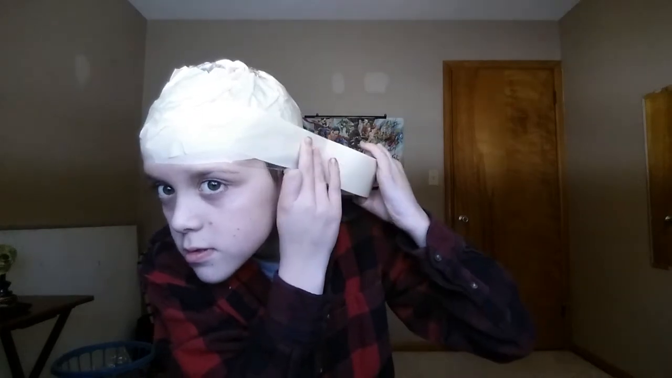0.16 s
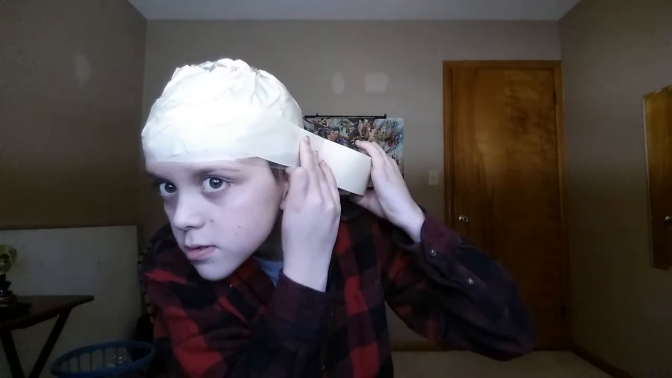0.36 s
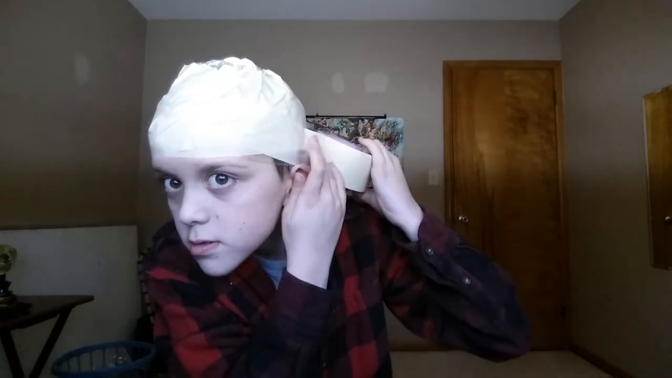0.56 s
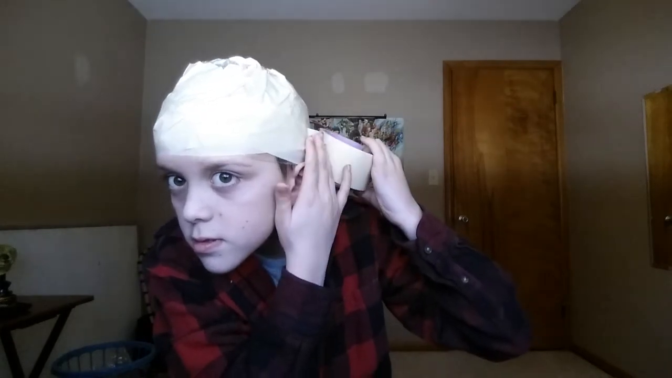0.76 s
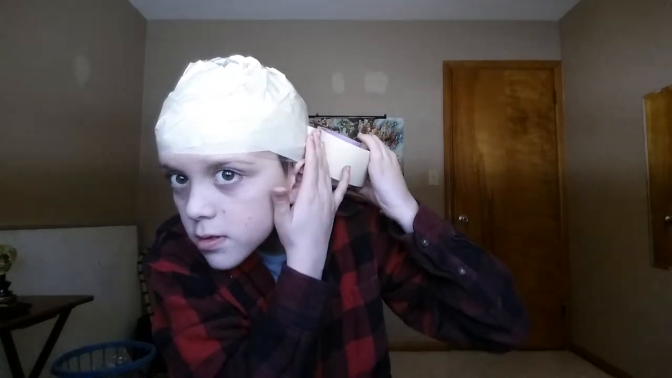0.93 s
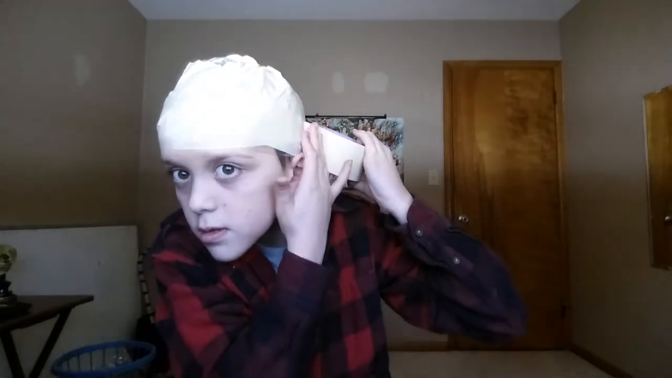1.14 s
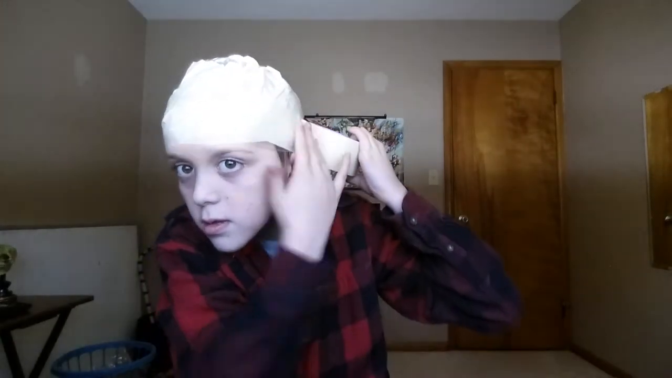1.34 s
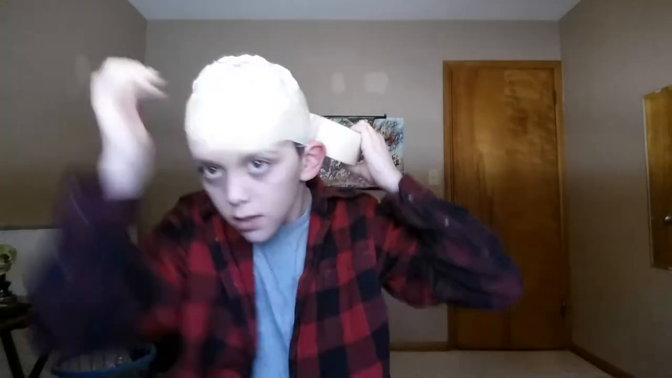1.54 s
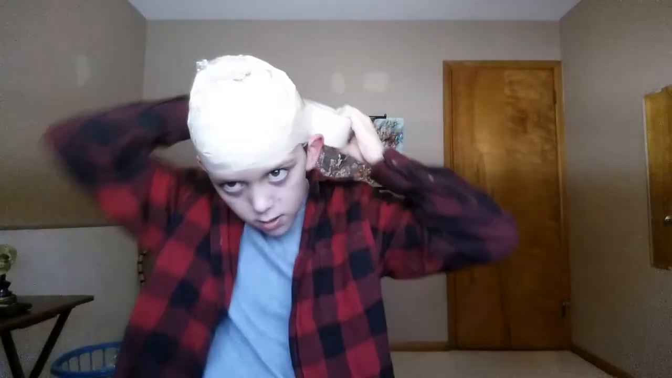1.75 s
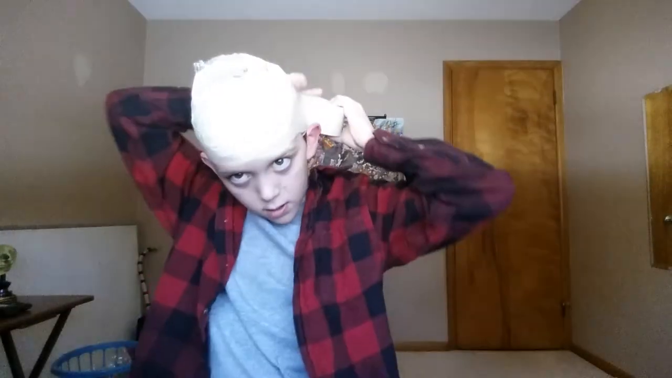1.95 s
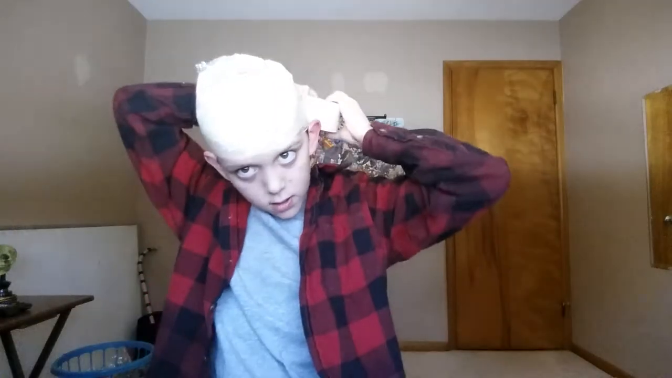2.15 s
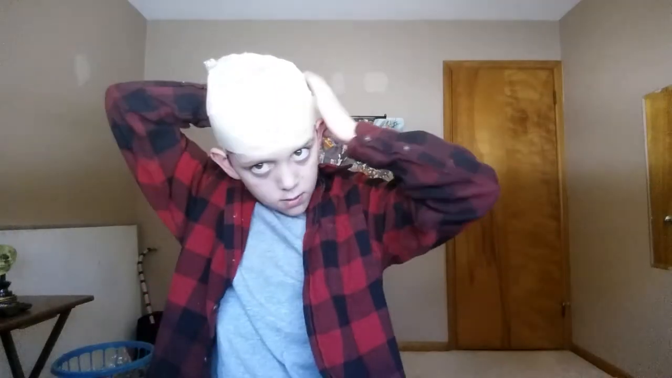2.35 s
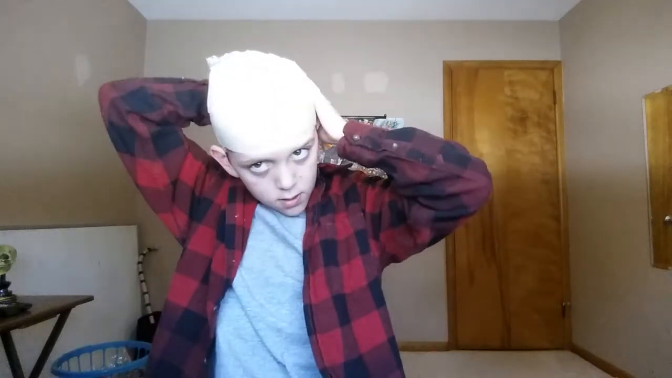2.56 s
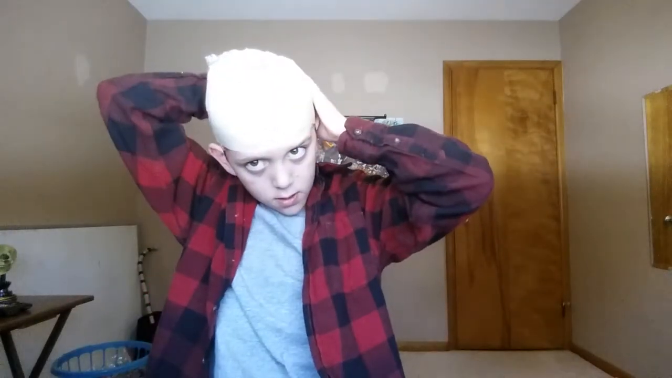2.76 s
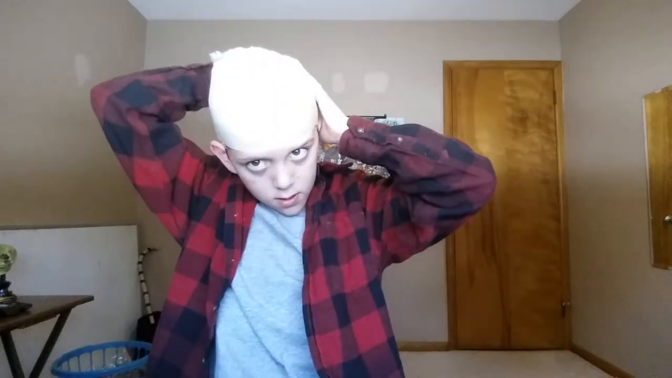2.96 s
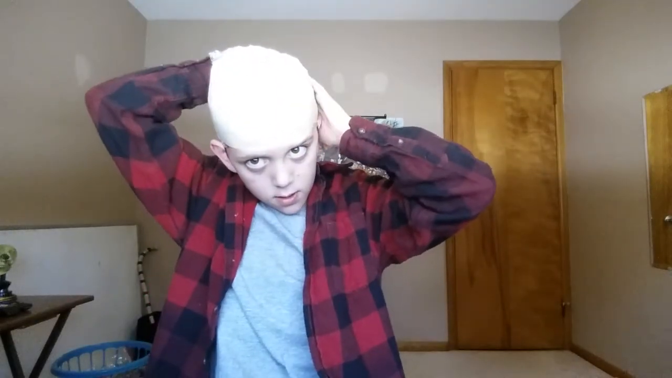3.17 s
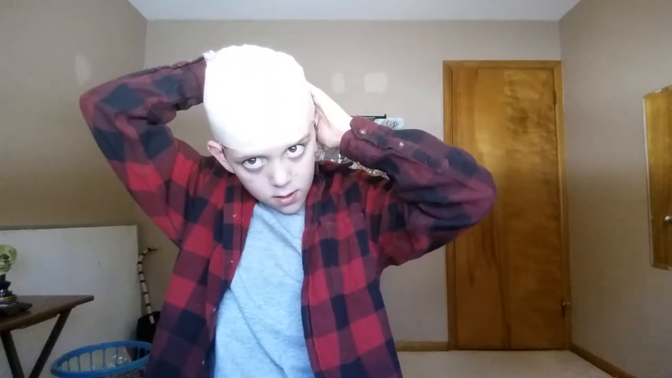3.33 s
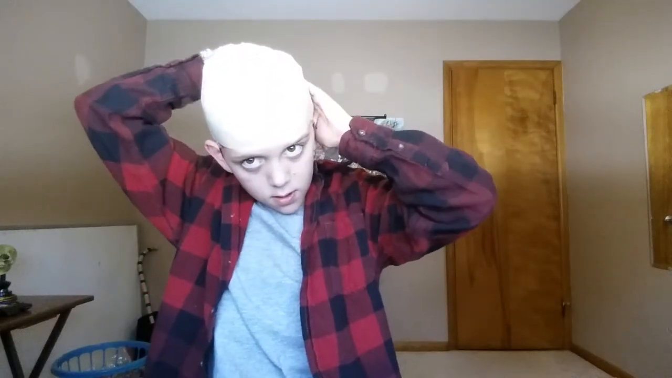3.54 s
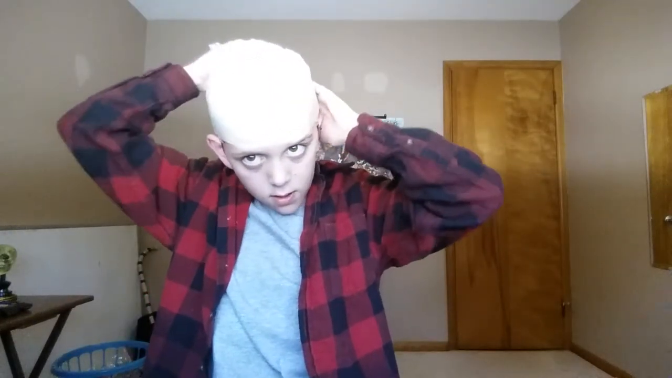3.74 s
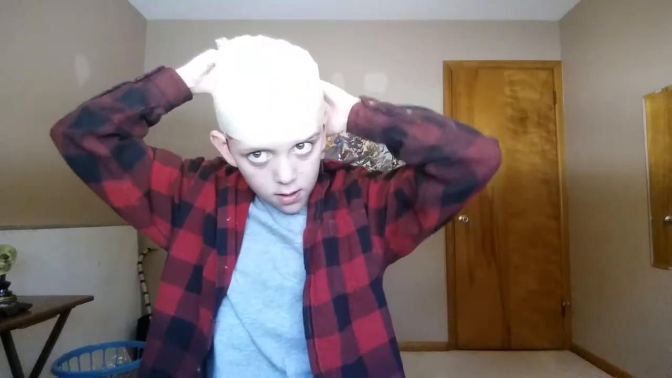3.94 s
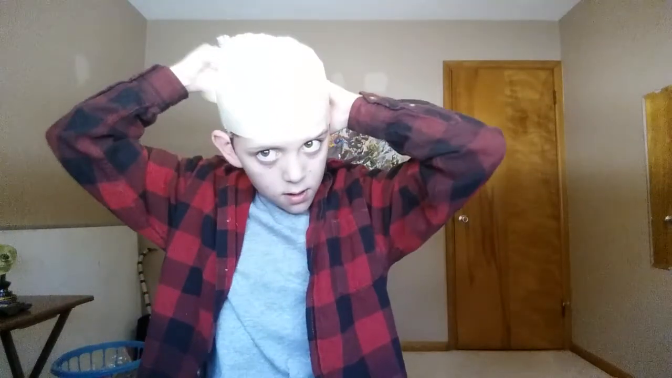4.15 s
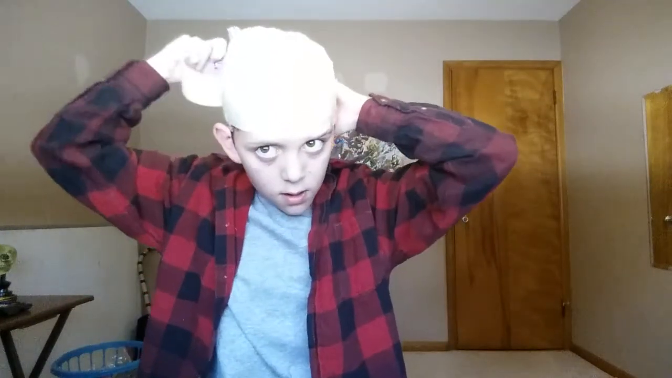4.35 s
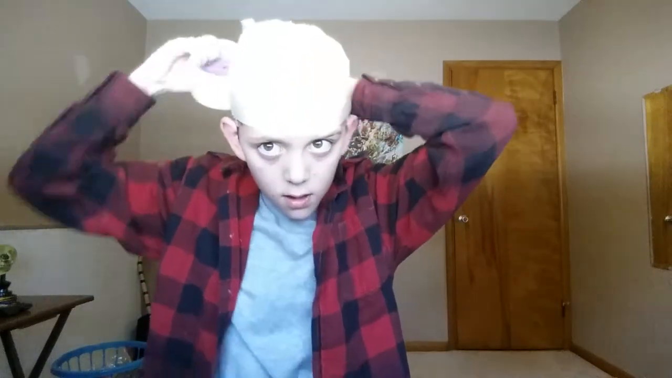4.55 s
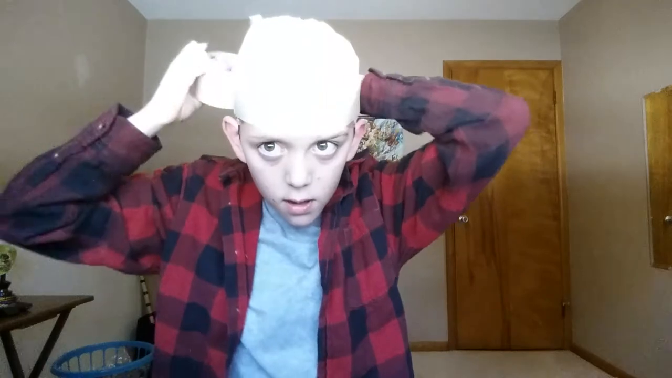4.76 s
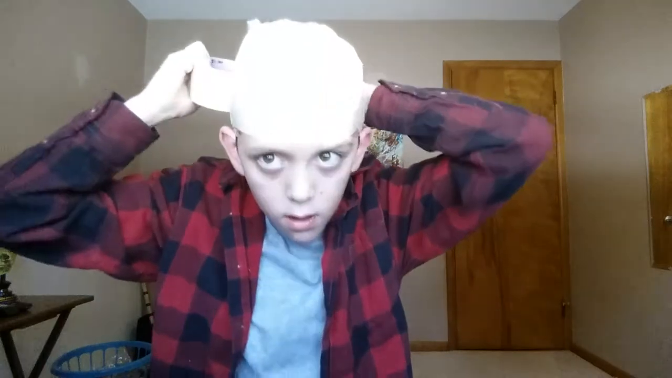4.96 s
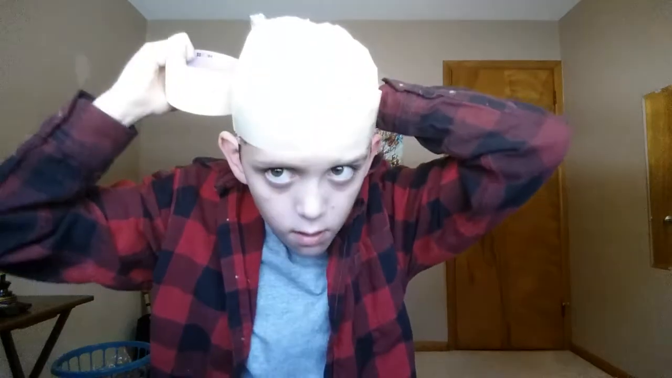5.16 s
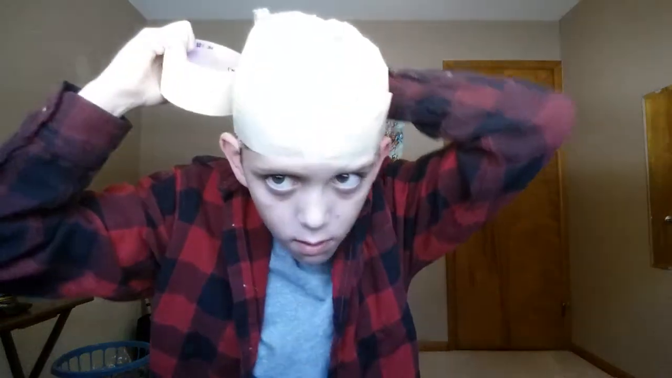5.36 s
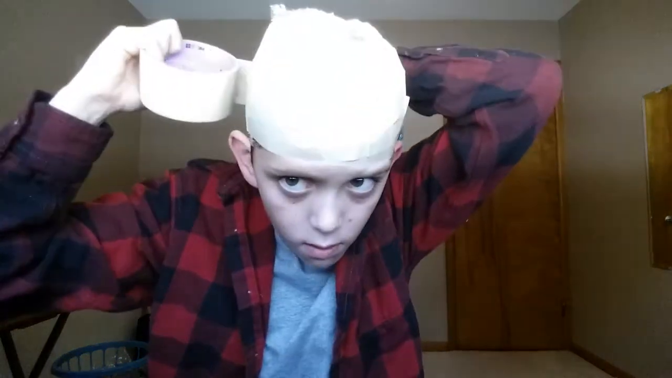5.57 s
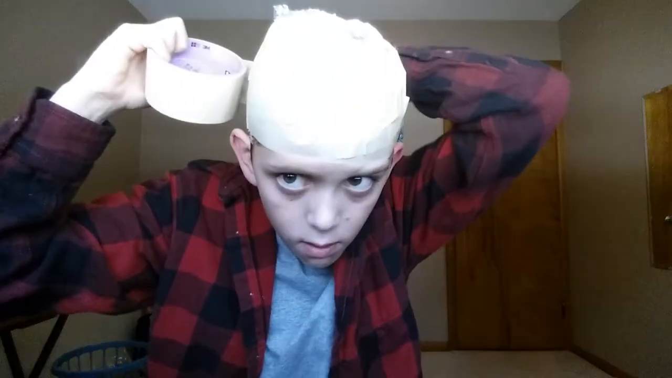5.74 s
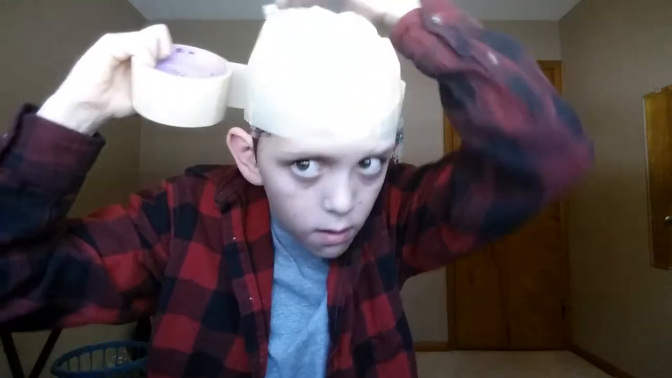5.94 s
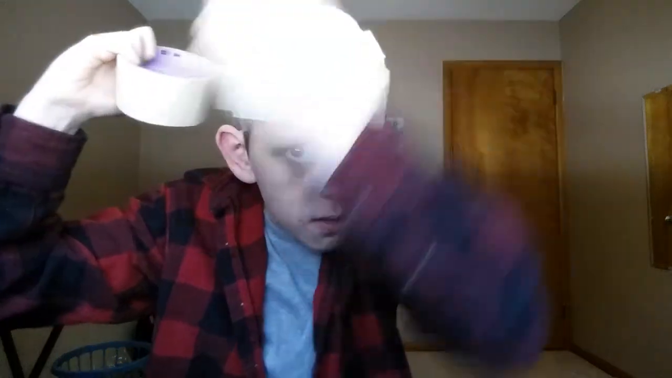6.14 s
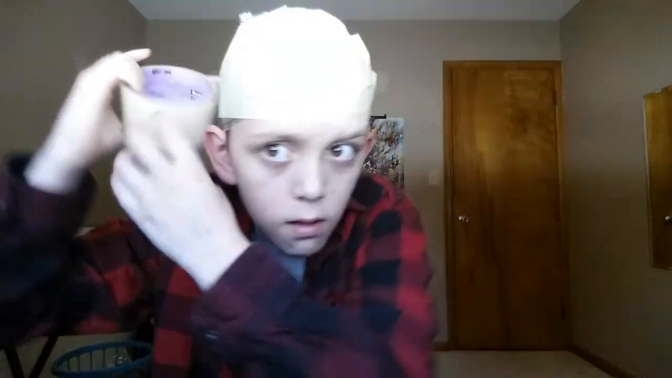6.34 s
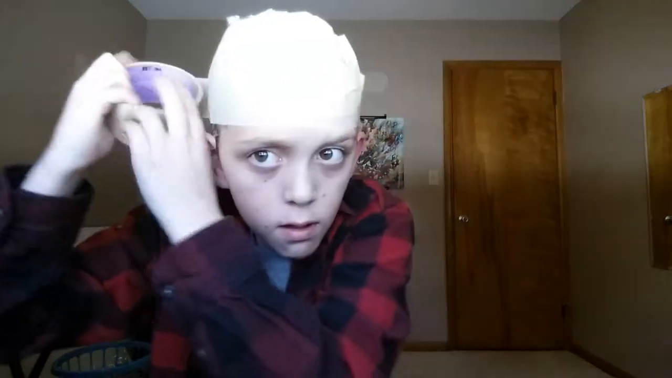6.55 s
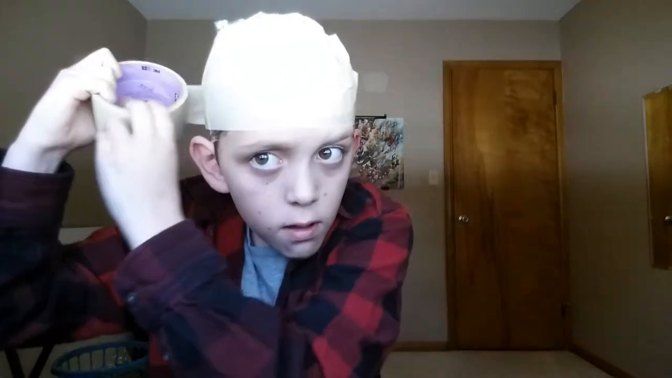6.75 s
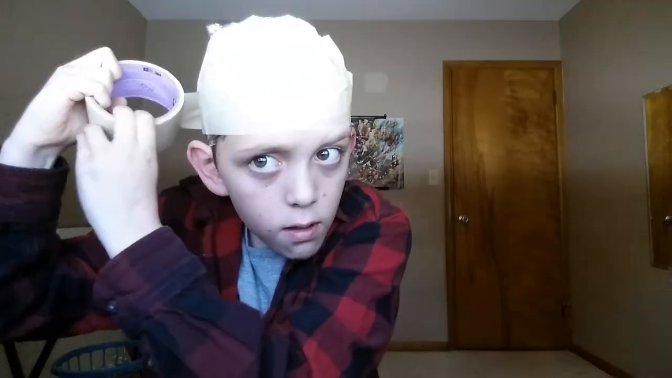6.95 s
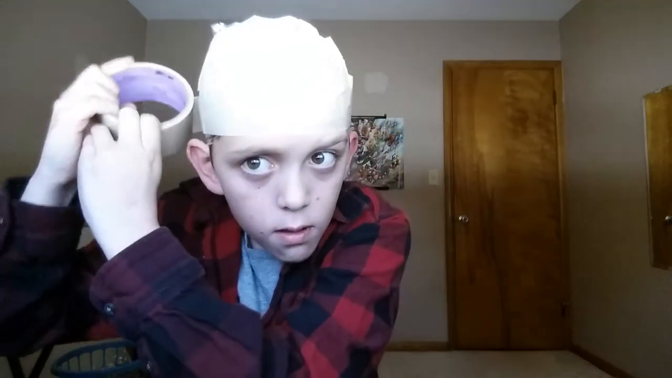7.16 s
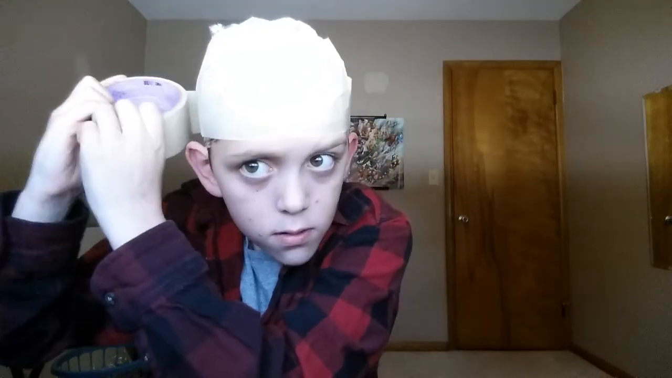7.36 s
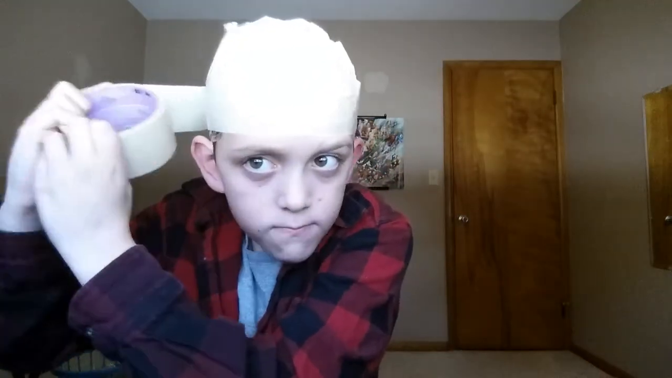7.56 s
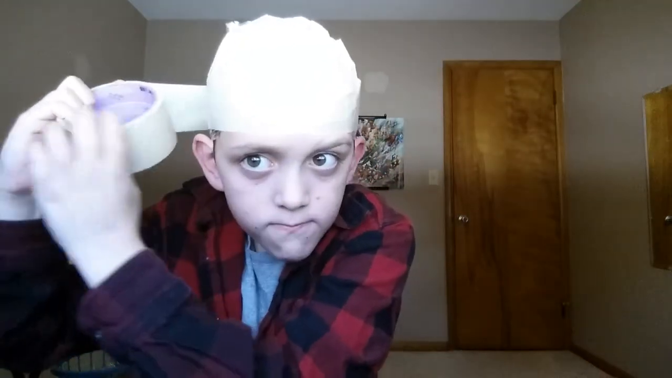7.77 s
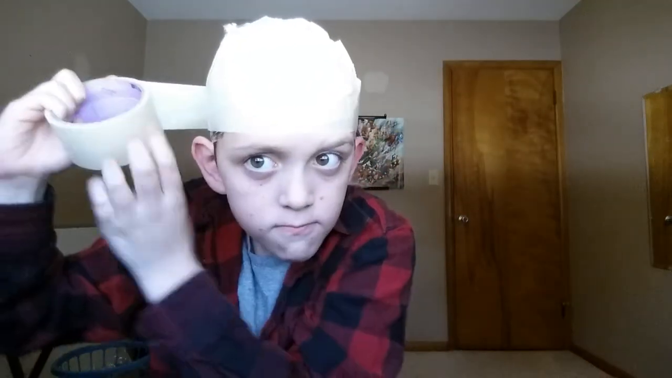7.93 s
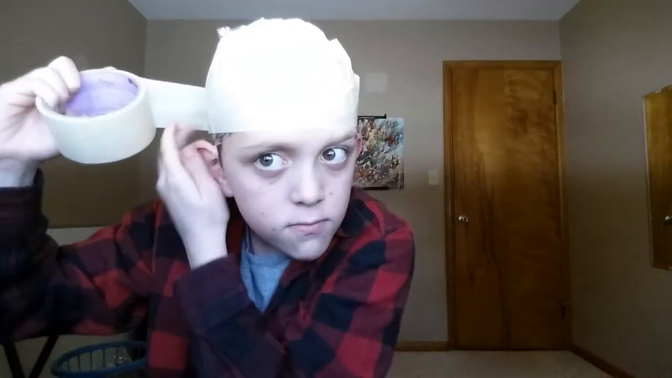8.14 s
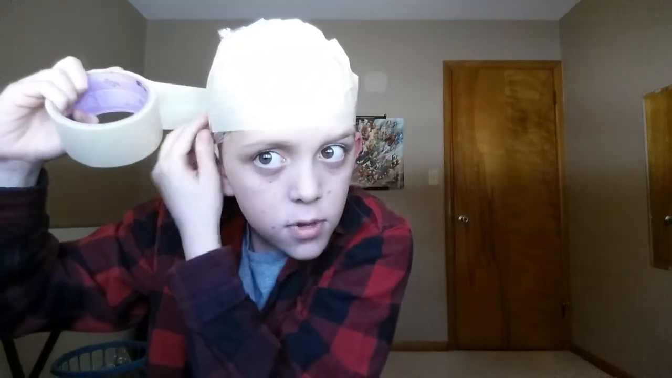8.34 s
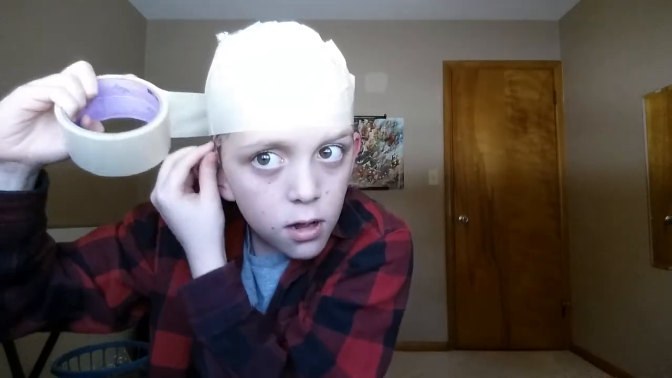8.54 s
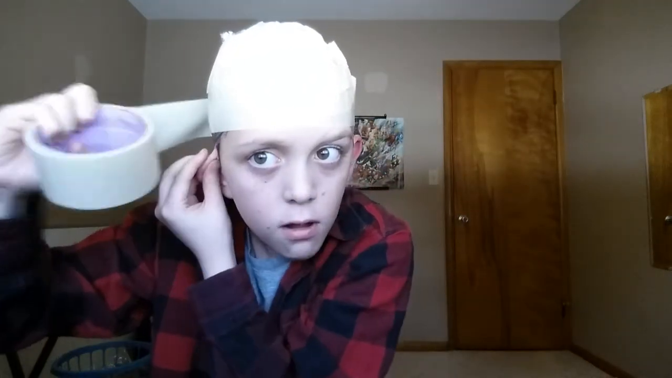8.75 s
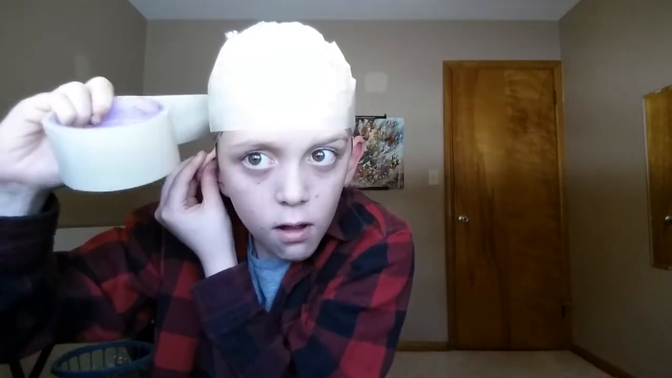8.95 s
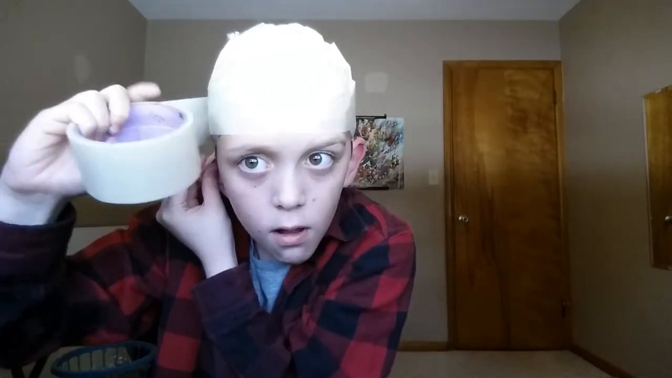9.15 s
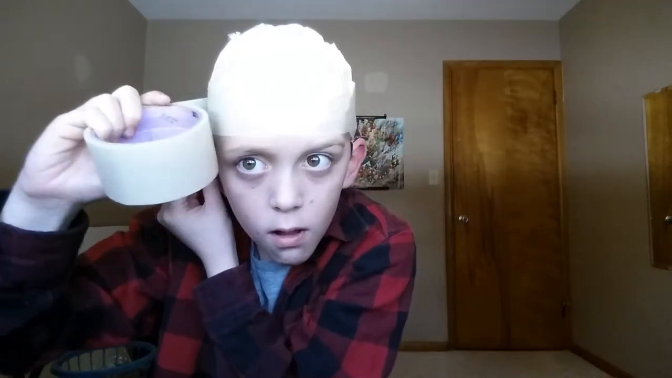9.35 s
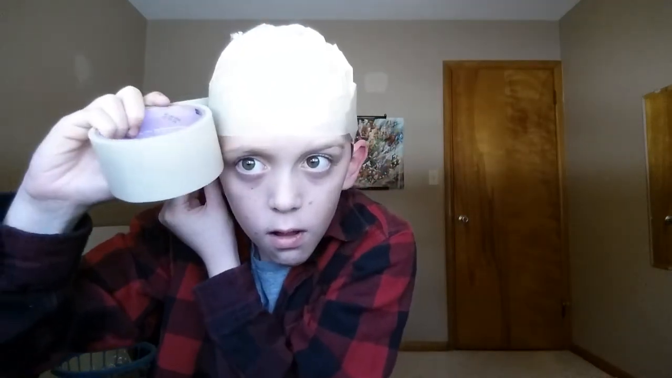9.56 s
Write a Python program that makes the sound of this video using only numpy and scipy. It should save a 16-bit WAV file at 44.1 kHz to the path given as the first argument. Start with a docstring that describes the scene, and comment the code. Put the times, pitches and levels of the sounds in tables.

```python
"""Wide paper tape is tugged off its roll in short rips, close to a small stereo microphone in a bare room.
Glue snaps are random clicks through resonances that flap and ring with the tape; gliding tones slip in.
Between rips fingers and sleeves rustle as shaped noise grains, glue ticks, and the cardboard core knocks.
Beneath lie a low house rumble of lumpy noise, a quiet uneven bed, hiss and a faint electric tick."""
import sys
import numpy as np
from scipy import signal
from scipy.fft import rfft, irfft
from scipy.io import wavfile
from scipy.ndimage import uniform_filter1d

SR = 44100
rng = np.random.default_rng(int(sys.argv[2]) if len(sys.argv) > 2 else 0)


def generate_wav(signal):
    """Clip the signal to [-1, 1] and save it as 16-bit WAV at the path in sys.argv[1]."""
    frames = np.transpose(np.atleast_2d(signal))
    scaled = np.clip(frames, -1, 1) * 32767
    pcm = np.round(scaled).astype(np.int16)
    wavfile.write(sys.argv[1], SR, pcm)


N = 427769


def gain_of(db):
    """Decibels to an amplitude factor."""
    return 10 ** (np.asarray(db) / 20)


def evened(x):
    """Scales to rms 1."""
    return x / np.sqrt(np.mean(x ** 2) + 1e-20)


def read(points, hz):
    """Reads a spectrum table on a log-frequency axis."""
    f, value = np.transpose(points)
    return np.interp(np.log(hz + 1), np.log(f + 1), value)


def impulse_of(points):
    """Causal minimum-phase impulse response of energy 1 with the table's gain curve."""
    hz = abs(np.fft.fftfreq(4096, 1 / SR))
    log_gain = np.log(gain_of(np.maximum(read(points, hz), -70)))
    h = np.fft.ifft(np.exp(np.conj(signal.hilbert(log_gain)))).real[:2048]
    return h / np.linalg.norm(h)


def coloured(x, points):
    """Passes x through the causal filter of a spectrum table."""
    return signal.oaconvolve(x, impulse_of(points)[None], axes=1)[:, :N]


def curves(rows):
    """Interpolates each column after the time column to every sample."""
    s, *columns = np.transpose(rows)
    return [np.interp(np.arange(N) / SR, s, c) for c in columns]


def sides(db):
    """Left and right gains for a level difference."""
    return gain_of([db / 2, -db / 2])


def snaps(per_s, spread_db, same):
    """Dense clicks of uneven size; the two ports hear them partly alike."""
    size_db = spread_db * np.minimum(rng.exponential(1, (2, N)), 4)
    size = gain_of(size_db) * (rng.random((2, N)) < per_s / SR)
    a, b = size * rng.choice([-1., 1.], (2, N))
    same = np.clip(same, -1, 1)
    right = same * np.roll(a, -4) + np.sqrt(1 - same ** 2) * b
    return evened(np.array([a, right]))


def lumps(seconds):
    """Slow random wander of rms 1: noise averaged twice over the given time."""
    width = int(seconds * SR)
    return evened(uniform_filter1d(uniform_filter1d(rng.standard_normal(N), width), width))


def band(x, hz, width_hz):
    """A fixed resonance of gain 1."""
    return signal.lfilter(*signal.iirpeak(hz, hz / width_hz, SR), x)


def resonate(x, hz, width_hz):
    """A moving resonance of gain 1: shifts the curve hz to zero, smooths, shifts back."""
    turn = np.exp(2j * np.pi * np.cumsum(hz) / SR)
    r = np.exp(-np.pi * width_hz / SR)
    return 2 * (turn * signal.lfilter([1 - r], [1, -r], x / turn)).real


# microphone noise spectrum: f/Hz, relative level/dB
HISS_SPECTRUM = [(400, -30), (700, 0.5), (1700, -10.5), (6000, -22), (11000, -12.5), (16000, -11.5)]
HISS_DB = -88.5


def hiss():
    """The faint steady noise of the microphone."""
    return gain_of(HISS_DB) * coloured(rng.standard_normal((2, N)), HISS_SPECTRUM)


# rumble course: t/s, level/dB
RUMBLE_LEVEL = [(0.0, -59), (0.02, -51), (1.24, -54), (1.46, -48.5), (1.56, -52), (2.94, -47), (3.4, -53.5),
                (3.75, -47), (4.0, -50), (4.62, -49.5), (4.67, -54.5), (5.37, -49), (5.51, -58),
                (7.35, -45), (7.67, -58), (8.45, -59.5), (8.48, -51.5), (9.7, -54.5)]
# room modes at the bottom, then a slope: f/Hz, relative level/dB
HOUSE_SPECTRUM = [(25, -16), (40, -14), (54, -3), (65, -2.5), (76, 1.5), (92, -11), (112, -4.5), (134, -5),
                  (150, -10.5), (200, -11.5), (237, -16.5), (400, -24.5), (700, -38), (1170, -72.5)]
# left-right likeness: f/Hz, correlation/1
HOUSE_LIKENESS = [(60, 0.99), (125, 0.97), (250, 0.88), (500, 0.26), (1000, .3)]


def rumble():
    """House noise: low, lumpy in time and frequency, nearly alike at both ports in the bass."""
    frames, hz = N // 2048 + 5, np.fft.rfftfreq(8192, 1 / SR)
    a, b, c, d, patches = rng.standard_normal((frames, 4097, 5)).T
    patches = evened(uniform_filter1d(uniform_filter1d(patches, 4, 0), 2, 1))
    same = np.clip(read(HOUSE_LIKENESS, hz), -1, 1)[:, None]
    left = a + 1j * b
    right = same * left + np.sqrt(1 - same ** 2) * (c + 1j * d)
    shape = gain_of(read(HOUSE_SPECTRUM, hz)[:, None] + 2.6 * patches) * (hz < 2500)[:, None]
    noise = signal.istft(np.array([left, right]) * shape, nperseg=8192, noverlap=6144)[1][:, :N]
    return gain_of(curves(RUMBLE_LEVEL)[0]) * evened(noise)


# quiet background bed, whose level rises and falls: t/s, level/dB, faint band near 1.3 kHz re level/dB
BED_COURSE = [(0, -71, -1), (.5, -73.5, 2), (1.1, -80, 2), (1.5, -76.5, 4), (1.95, -83, 16.5),
              (2.4, -71.5, 4.5), (3.4, -73, 1.5), (4.1, -82, 5), (4.8, -76.5, 4.5), (5.1, -81, 9),
              (5.9, -77, 9), (6.15, -91.5, 20), (6.5, -83, 21), (7.2, -71, -6), (7.85, -80, -1),
              (8.25, -100, 6), (8.6, -99, 3), (9.2, -85, 9), (9.6, -93.5, 6)]
BEACON_PERIOD_S, FIRST_BEACON_S, BEACON_HZ = .1024, .0674, 4100
BEACON_DB, BEACON_FOLLOW = -73, 0.88  # mean level at -75 dB bed; dB per dB of bed


def beacon():
    """Electric click: a brief 4.1 kHz ring about ten times a second, following the bed level."""
    clicks, t = np.zeros(N), np.arange(200) / SR
    clicks[np.round(np.arange(FIRST_BEACON_S, N / SR, BEACON_PERIOD_S) * SR).astype(int)] = 1
    blip = np.sin(2 * np.pi * BEACON_HZ * t) * np.exp(-.5 * ((t - .0006) / 0.001) ** 2)
    bed_db = curves(BED_COURSE)[0]
    level_db = BEACON_DB + BEACON_FOLLOW * (bed_db + 75) + 2.5 * rng.standard_normal(N)
    return signal.oaconvolve(clicks * gain_of(level_db), blip)[:N]


# rustle swells (hand strokes, and the dull tails left after rips):
# peak t/s, bright level/dB, swell/s, fade/s, dull re bright/dB, rub tone re dull/dB
RUSTLE_SWELLS = [(.04, -59, .3, 0.09, -6, -10), (.3, -77, .1, 0.16, -1.5, 4),
                 (.601, -57, 0.055, 0.12, -14.5, -5), (.68, -60, .04, 0.16, -32, -1),
                 (.91, -74, .03, 0.12, 3, -5), (1.09, -71, 0.029, .2, -3, -7),
                 (1.136, -73, .03, 0.072, -6.5, -3), (1.39, -63, 0.052, 0.078, -6.5, -12),
                 (1.481, -73.5, 0.11, 0.16, -3.5, -10), (2.099, -65, .1, 0.24, -12, -1.5),
                 (2.18, -57, .04, 0.1, -3, -1), (2.276, -60.5, 0.16, 0.25, -4.5, -10),
                 (2.49, -65, .4, 0.09, -9, -3), (3.09, -64, 0.059, 0.23, 4.5, -11.5),
                 (3.58, -74, 0.25, .1, -2, -3), (3.85, -64, 0.12, 0.9, 2.5, -4),
                 (4.0, -74, 0.29, 0.082, -11, -5), (4.195, -78, .15, 0.069, -1.5, -5),
                 (4.42, -63.5, 0.13, 0.21, 3, 5), (4.58, -60.5, .4, 0.38, -2, 5.5),
                 (4.834, -81, .2, 0.15, 7, 10), (5.12, -70.5, 0.31, .1, -6.5, 1.5),
                 (5.701, -79.5, .1, 0.26, 9.5, 11.5), (5.868, -63.5, 0.18, 0.25, -7.5, 3.5),
                 (6.0, -68.5, 0.16, 0.033, -3, 5), (6.07, -71, 0.053, 0.054, -1, 1.5),
                 (6.43, -78, 0.54, 0.14, -16, 1), (6.57, -55, 0.028, 0.14, -8, -6),
                 (6.73, -60.5, 0.11, 0.041, -4, 10), (6.778, -43.5, 0.032, .15, -8.5, -8),
                 (6.918, -53, 0.21, 0.49, -8.5, 13), (7.085, -54.5, 0.28, 0.18, -12, -5),
                 (7.17, -67, 0.27, 0.063, -16, 2), (7.29, -60.5, 0.066, 0.23, -5.5, 7),
                 (7.36, -56.5, 0.23, 0.17, -19.5, -1), (7.43, -49.5, 0.088, 0.2, -13, 1),
                 (7.72, -66, .1, .4, -4, 4), (7.827, -62, 0.029, 0.028, -4, -6.5),
                 (8.412, -65, 0.021, 0.043, -25, -3), (8.586, -74.5, 0.15, .1, -21.5, -1.5),
                 (8.67, -57.5, 0.14, .05, -18.5, 2), (8.95, -78, 0.26, 0.32, 14.5, -8),
                 (9.05, -73, 0.063, .07, -4, -3)]
# bright grains: f/Hz, relative level/dB
CLOTH_BRIGHT_SPECTRUM = [(3530, -46.5), (6000, -20.5), (8740, -23), (9600, -7), (12300, -0.5),
                         (15600, -5.5), (16300, -19.5), (16500, -57)]
# dull grains: f/Hz, relative level/dB
CLOTH_DULL_SPECTRUM = [(290, -24), (500, -3), (925, -12), (1560, -19), (1900, -20), (2950, -20),
                       (3240, -18.5), (8000, -37), (10400, -53.5), (17600, -120)]
SWELL_SPAN_DB = 27.5  # level change over one swell or fade time
RUB_HZ, BED_HZ, BED_BRIGHT_DB = 1920, 1310, -8.5  # bright re bed level
CONTROL_STEP = 32  # samples


def rustle():
    """Fine clumped grains: skin and cloth rubs that sing faintly, rip tails, a bed that rises and falls."""
    t = np.arange(0, N, CONTROL_STEP) / SR
    bed_db, band_db = curves(BED_COURSE)
    power = np.zeros((3, len(t)))  # bright, dull, rub tone
    for s, db, swell_s, fade_s, dull_db, rub_db in RUSTLE_SWELLS:
        away = np.maximum((s - t) / max(swell_s, .005), (t - s) / max(fade_s, .005))
        shape_db = db - SWELL_SPAN_DB * away
        power += gain_of(2 * (shape_db + np.cumsum([0, dull_db, rub_db])[:, None]))
    power = np.repeat(power, CONTROL_STEP, axis=1)[:, :N]
    power[:2] += gain_of(2 * (bed_db + np.array([[BED_BRIGHT_DB], [0]])))
    bright, dull, rub = np.sqrt(power) * gain_of(1.5 * lumps(0.0038))
    # the hands stay near the roll
    pan_db = -2.5 + 0.15 * curves([(row[0], row[-1]) for row in TAPE_RIPS])[0]
    bright_grains = snaps(7000, 3.0, 0.071) + 0.1 * snaps(120, 4.0, .1)
    bright = coloured(bright * sides(pan_db) * bright_grains, CLOTH_BRIGHT_SPECTRUM)
    grains = coloured(snaps(7000, 1.5, .3), CLOTH_DULL_SPECTRUM)
    rub_tone = rub * band(grains, RUB_HZ, 240)
    bed_tone = gain_of(bed_db + band_db) * band(grains, BED_HZ, 190)
    return bright + gain_of(-7) * band(bright, 13000, 1300) + dull * grains + rub_tone + bed_tone


# reverberation: f/Hz, t60/s
ROOM_T60 = [(250, 0.61), (660, 0.33), (1740, 0.43), (4590, 0.41), (12100, 0.22)]


def room(x):
    """Sparse taps of random sign, one per 20 samples, each band dying at its own speed."""
    taps = np.zeros((3, 2, SR))
    at = np.arange(200, SR - 20, 20) + rng.integers(0, 20, (3, 2, (SR - 201) // 20))
    np.put_along_axis(taps, at, rng.choice([-1., 1.], at.shape), 2)
    hz, t, z = signal.stft(taps, SR, nperseg=256)
    tails = signal.istft(z * gain_of(-60 * t / read(ROOM_T60, hz)[:, None]), SR, nperseg=256)[1]
    # three sets of random paths take turns at 23 Hz, keeping the tail's colour even
    phase = np.arange(N) * 23 / SR + np.arange(3)[:, None] / 3
    turn = np.sqrt(2 / 3) * np.cos(2 * np.pi * phase)
    wet = signal.fftconvolve((x.mean(0) * turn)[:, None], tails / np.linalg.norm(tails[0, 0]), axes=2)
    return wet.sum(0)[:, :N]


# fingers on the cardboard core: t/s, level/dB, f/Hz
CORE_KNOCKS = [(0.523, -52, 600), (0.648, -72, 630), (1.361, -48, 384), (1.841, -52.5, 382),
               (2.316, -56, 549), (3.027, -39, 850), (3.59, -38, 1024), (4.578, -54.5, 406),
               (5.949, -49.5, 376), (6.036, -41.5, 387), (6.549, -43.5, 385), (6.591, -46.5, 666),
               (6.699, -43.5, 517), (6.774, -31.5, 390), (7.087, -45, 500), (7.277, -41, 468),
               (7.416, -36.5, 526), (7.484, -32.5, 450), (7.823, -52, 378)]
KNOCK_T60_S = 0.022


def knocks():
    """A damped thump with two weaker overtones that die twice as fast."""
    out, t = np.zeros(N + 6000), np.arange(6000) / SR
    dying = gain_of(-60 * t / KNOCK_T60_S)
    for s, db, hz in CORE_KNOCKS:
        at, turn = round(s * SR), 2 * np.pi * hz * t
        overtones = (.5 * np.sin(1.85 * turn) + 0.13 * np.sin(3.7 * turn)) * dying
        out[at:at + 6000] += gain_of(db) * dying * (np.sin(turn) + overtones)
    return np.array([out[:N], out[:N]])


# glue and finger ticks: t/s, level/dB, dull part re level/dB, dull f/Hz, left-right/dB
GLUE_TICKS = [(0.056, -28, -11, 2480, -4), (0.539, -36.5, -18.5, 2560, -1), (0.6502, -15.5, -21, 2660, 1.5),
              (0.8927, -30, -16.5, 2560, 3), (0.958, -64.5, 3.5, 2600, 5), (1.075, -53, -23, 1360, -13),
              (1.134, -45, -28, 1370, -14), (1.3662, -46.5, -4, 1190, 0.5), (2.169, -48.5, -4, 1270, -10),
              (2.308, -44, -12.5, 1350, -9), (2.511, -38, -28, 2090, 1.5), (2.744, -33, -8, 2130, 9),
              (3.0295, -33, -17, 2300, -24), (3.606, -26, -13, 2050, 1.5), (4.203, -35, -1, 2120, -10),
              (5.2926, -18, -28, 2150, -7), (6.038, -23, -32.5, 2390, -9), (6.55, -42.5, -23.5, 1266, -27),
              (6.561, -31, -33, 1304, -7), (6.699, -36, -17, 1930, -5), (6.737, -38, -31, 1340, -13),
              (6.769, -42, -22, 1730, -9), (6.7753, -5.5, -37.5, 1910, -3), (7.365, -39, -34, 1260, -4),
              (7.419, -20.5, -37, 1200, -9), (7.483, -15.5, -22.5, 1910, 3), (7.823, -44, -29, 1980, -13),
              (7.848, -54.5, -17, 3330, -5), (7.869, -42, -25, 1830, -7), (7.925, -58, -11.5, 1810, -6),
              (7.952, -64, -14, 3000, -5), (8.415, -56, -22, 3160, -1), (8.533, -57.5, -27, 1346, -6.5),
              (8.5635, -52, -33.5, 1234, -9), (8.678, -16, -35.5, 1450, -6)]
# glue fizz, also in rips: f/Hz, relative level/dB
FIZZ_SPECTRUM = [(2940, -45.5), (5000, -25), (7880, -12), (8930, -9), (9960, 0), (12300, 0), (15900, -0.5),
                 (16300, -21.5), (16500, -47.5)]
# flapping paper, also in rips: f/Hz, relative level/dB
FLAP_SPECTRUM = [(530, -27), (900, -11), (1070, -7), (1400, -8.5), (2220, 0.5), (3120, -4.5), (3960, 1.5),
                 (5110, -7), (8000, -9), (10400, -38.5), (17600, -120)]
# roll and strip, also in rips: f/Hz, relative level/dB
THRUM_SPECTRUM = [(150, -48), (250, -12), (378, -1), (521, 0.5), (588, -2.5), (658, -0.5), (1060, -2.5),
                  (1400, -8), (1500, -5), (1950, -33.5), (3300, -120)]
TICK_DECAY_S = 0.00084


def ticks():
    """Each tick is a very short crackle: a bright snap and a dull ring of the paper."""
    snap, dull, t = np.zeros((2, N + 900)), np.zeros((2, N + 900)), np.arange(900) / SR
    crackle = rng.standard_normal((len(GLUE_TICKS), 2, 900))
    for (s, db, dull_db, hz, pan_db), noise in zip(GLUE_TICKS, crackle):
        burst = noise * (np.exp(-t / TICK_DECAY_S) + 0.085 * np.exp(-t / 0.01))
        burst = gain_of(db) * burst / np.linalg.norm(burst, axis=1)[:, None] * sides(pan_db)[:, None]
        at = slice(round(s * SR), round(s * SR) + 900)
        snap[:, at] += burst
        paper = gain_of(11) * band(burst, hz, 350) + gain_of(5) * band(burst, 1.2 * hz, 450)
        dull[:, at] += gain_of(dull_db) * (burst + paper)
    bright = gain_of(2.5) * coloured(snap, FIZZ_SPECTRUM)
    return bright + gain_of(8.5) * coloured(dull, FLAP_SPECTRUM) + gain_of(5.5) * coloured(dull, THRUM_SPECTRUM)


# slip tones as the peel changes speed: start t/s, end t/s, first f/Hz, last f/Hz, level/dB
SLIP_GLIDES = [(.118, 0.152, 1421, 327, -47), (3.65, 3.67, 1227, 295, -43), (4.258, 4.274, 930, 455, -42.5),
               (5.472, 5.522, 828.4, 379.3, -45), (7.539, 7.556, 1353, 628, -39.5),
               (8.708, 8.737, 1252, 1493, -52.5), (8.734, 8.77, 1354, 609, -48.5)]


def zips():
    """Regular slips: a wavering tone and its octave glide with the slip rate."""
    out, flutter = np.zeros(N), gain_of(1.7 * lumps(0.0022))
    for start, end, first_hz, last_hz, db in SLIP_GLIDES:
        hz = np.geomspace(first_hz, last_hz, round((end - start) * SR))
        turn = 2 * np.pi * np.cumsum(hz) / SR
        tone = (np.sin(turn) + 0.85 * np.sin(2 * turn)) * signal.windows.tukey(len(turn), .3)
        out[round(start * SR):][:len(tone)] += gain_of(db) * np.sqrt(2) * tone
    return flutter * out * sides(-1.7)[:, None]


SPENT_DB = 28.5  # the rip ends once it has fallen this far
# re top of rip: low ring/dB, then ratios of low pitch, high pitch, fizz centre
AT_JERK, AT_HALT = (9.8, 1.4, 0.8, 1.01), (5.1, 0.52, 1.1, 1.1)
FLAP_AT_HALT_DB = 3.5  # re end of hold
FLAP_LAG = 0.42  # share of the flap's dB change reached at 3/5 of the climb


def pull(start, rise, hold, top_db, first_db, bend_up, fall_db_s, first_flap_db, flap_db, low_db,
         low_hz, high_hz, fizz_hz, focus_db, pan_db, until):
    """Controls of one rip: jerk, climb, hold, fall; colour and pitch move from jerk to top to halt."""
    climb = np.linspace(0, 1, num=6)
    fall = min(SPENT_DB / fall_db_s, until - start - rise - hold)
    s = start + np.r_[rise * climb, rise + hold, rise + hold + fall]
    force_db = top_db + np.r_[first_db * (1 - climb) ** bend_up, 0, -fall * fall_db_s]
    bend = [np.interp(s, s[[0, -3, -2, -1]], [jerk, top, top, halt])
            for jerk, halt, top in zip(AT_JERK, AT_HALT, (0, 1, 1, 1))]
    late_flap_db = first_flap_db + FLAP_LAG * (flap_db - first_flap_db)
    flap_course_db = np.interp(s, s[[0, 3, -2, -1]],
                               [first_flap_db, late_flap_db, flap_db, flap_db + FLAP_AT_HALT_DB])
    return np.transpose([s, force_db, flap_course_db, low_hz * bend[1], low_db + bend[0],
                         high_hz * bend[2], fizz_hz * bend[3], focus_db + 0 * s, pan_db + 0 * s])


# rips: start t/s, rise/s, hold/s, top force/dB, first force re top/dB, climb bend/1 (>1 = quick at first),
# fall/(dB/s), flap re force at start/dB, same at hold end/dB, low ring re force at top/dB,
# low tape f/Hz at top, high tape f/Hz at top, fizz centre f/Hz at top, fizz emphasis/dB, left-right/dB
TAPE_RIPS = [(0.055, 0.048, 0.027, -23.5, -3, 1, 330, -11.5, -9, -21, 880, 3380, 10630, -7.5, -1.5),
             (2.5061, .025, .04, -30.5, -7, 1.5, 330, -4.5, -13.5, -12, 430, 2450, 12400, -6, 2),
             (2.747, .09, .03, -23.5, -15, 2.2, 259, -5, -8.5, -12, 894, 2570, 12400, -9, -0.5),
             (3.0255, 0.0085, 0.011, -54, 0.5, 2.1, 260, 13, 2.5, 5, 897, 2370, 11300, -6, -3),
             (3.59, .074, .01, -24.5, -17.5, 1.9, 195, -5, -9, -14, 923, 2230, 12400, -6, 1),
             (4.206, .048, .025, -30, -7, 2.2, 228, 0, -7.5, -16, 700, 2260, 11900, -5.5, -6.5),
             (5.127, .028, .04, -28, -8.5, 2.27, 254.4, -15, -6.5, -15, 886, 2400, 12000, -6.5, -5.5),
             (5.3586, .003, .008, -30.5, -0.5, 1.5, 300, -6.5, -11, -13, 1030, 2350, 10580, -8, -11),
             (5.437, 0.039, 0.02, -20.5, -6, .7, 340, -19.5, -9.5, -21, 699, 2170, 10410, -8.5, -10),
             (7.482, 0.034, 0.035, -28, -3, 0.99, 260, -17, -10, -14.5, 1050, 2060, 12360, 1, -8.5),
             (8.676, .03, .04, -27.5, -12.5, 2.9, 206, -23, -11, -17.5, 1000, 2220, 11900, 0.5, -5)]
WANDER_DB = 6  # random left-right wander within rips


def rips():
    """Glue threads snap by the thousand along the peel line; the free tape flaps and rings with them."""
    ends = [row[0] for row in TAPE_RIPS[1:]] + [N / SR]
    pulls = [pull(*row, until - .001) for row, until in zip(TAPE_RIPS, ends)]
    controls = curves(np.concatenate(pulls))
    force_db, flap_db, low_hz, low_db, high_hz, fizz_hz, focus_db, pan_db = controls
    pan_db = pan_db + WANDER_DB * np.tanh(lumps(.012))
    t, moving = np.arange(N) / SR, np.zeros(N)
    for rows in pulls:  # each rip opens within 1.5 ms and fades out over its last 30 ms
        start, halt = rows[0][0], rows[-1][0]
        moving += np.interp(t, [start, start + 0.0015, halt - .03, halt], [0, 1, 1, 0])
    # fast random unevenness of the level
    uneven_db = 2.2 * np.tanh(lumps(0.0014)) + 1.2 * np.tanh(lumps(0.0046))
    force = moving * gain_of(force_db + uneven_db)

    fizz = coloured(force * sides(pan_db) * snaps(9000, 1.9, .3), FIZZ_SPECTRUM)
    fizz = gain_of(-2.0) * fizz + gain_of(focus_db) * resonate(fizz, fizz_hz, 800)

    shake = force * sides(0.42 * pan_db) * gain_of(flap_db + 0.89 * lumps(0.013)) * snaps(4000, 1.2, 0.49)
    high_ring = resonate(resonate(shake, high_hz, 820), high_hz, 820)
    flap = gain_of(-2.5) * coloured(shake, FLAP_SPECTRUM) + gain_of(2.5) * high_ring

    pluck = force * gain_of(low_db + 4.0 * lumps(0.018)) * snaps(1500, 1.9, 1.0)
    low_ring = resonate(resonate(pluck, low_hz, 200), low_hz, 200)
    return fizz + flap + gain_of(-7) * coloured(pluck, THRUM_SPECTRUM) + gain_of(8.5) * low_ring


def scene():
    """Tape, ticks and knocks ring in the room over rustle, rumble, hiss and beacon."""
    tape, tick = rips() + zips(), ticks() + knocks()
    wet = room(gain_of(-2.5) * tape + gain_of(-6.5) * tick)
    return tape + tick + wet + rustle() + rumble() + hiss() + beacon()


# port difference: f/Hz, left-right/dB
PORT_BALANCE = [(250, 0), (700, -1.5), (1400, -3), (3100, 1.5), (6000, 6), (8500, -4.5), (10500, -9),
                (12500, 1), (15500, 4)]
EDGE_HZ = 15790


def record(dry):
    """The two microphone ports colour the sound differently; then a low-pass limits the band."""
    hz = np.fft.rfftfreq(N, 1 / SR)
    ported = irfft(rfft(dry) * sides(read(PORT_BALANCE, hz)), N)
    edge = signal.firwin(1023, EDGE_HZ, window=("kaiser", 6), fs=SR)
    return signal.oaconvolve(ported, edge[None], "same")


dry = scene()
out = record(dry)
generate_wav(out)
```